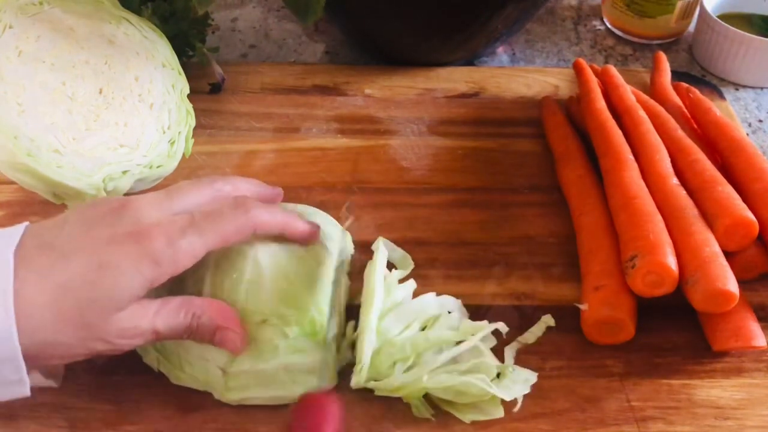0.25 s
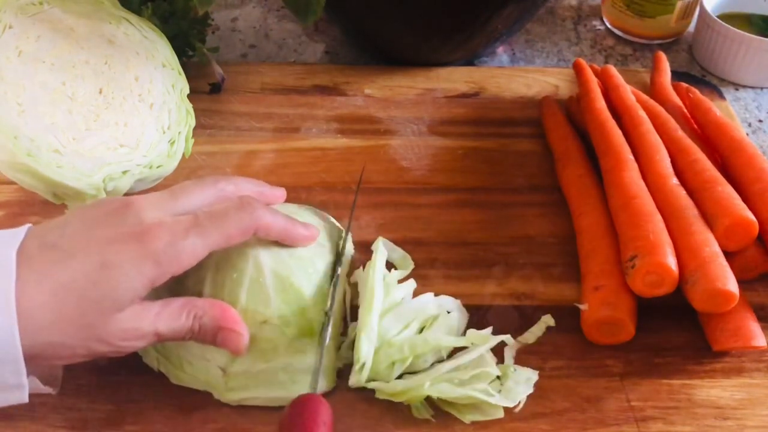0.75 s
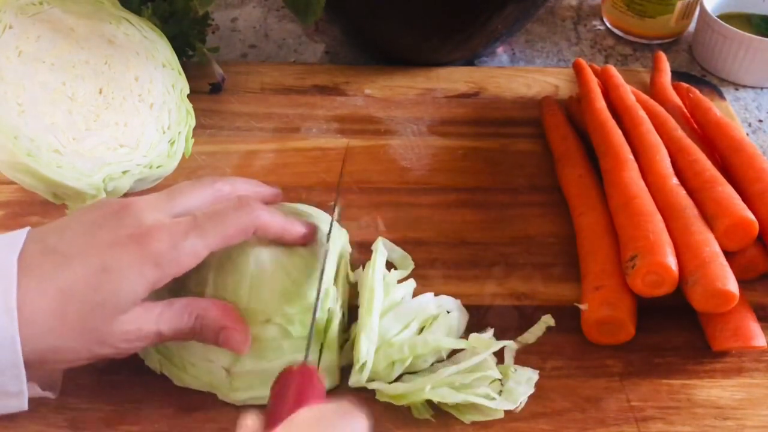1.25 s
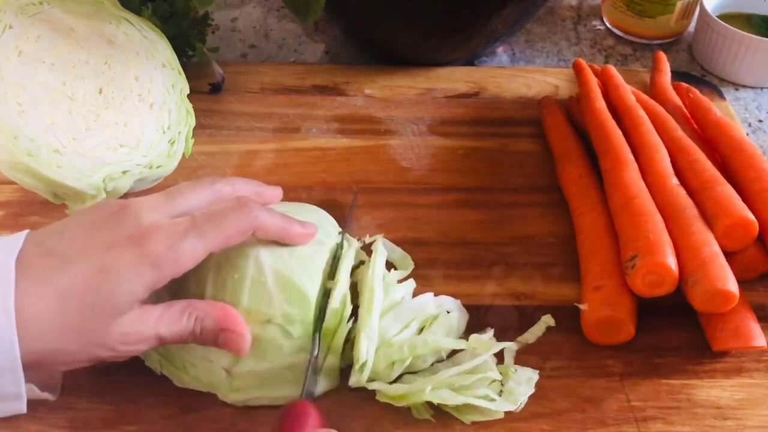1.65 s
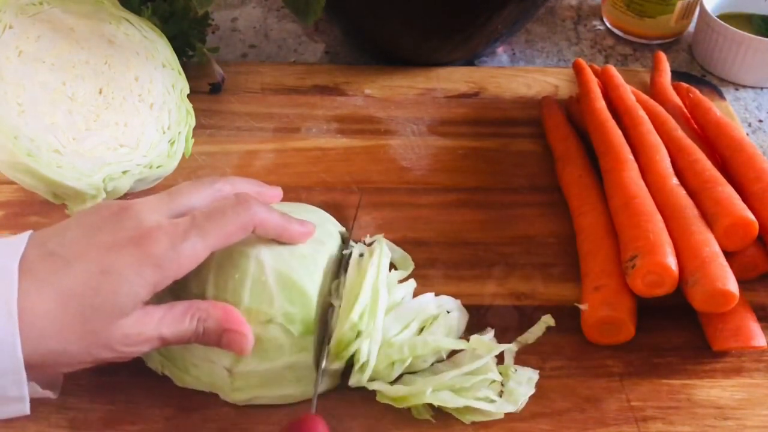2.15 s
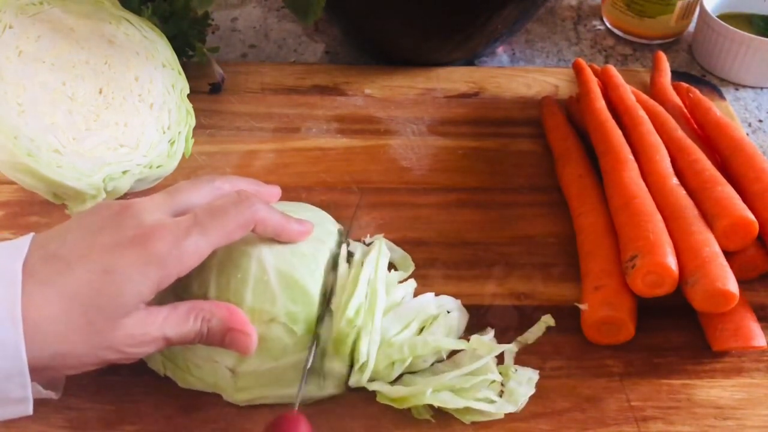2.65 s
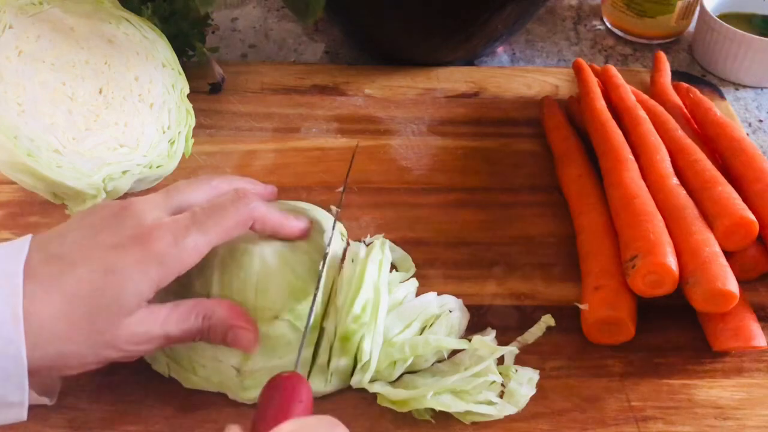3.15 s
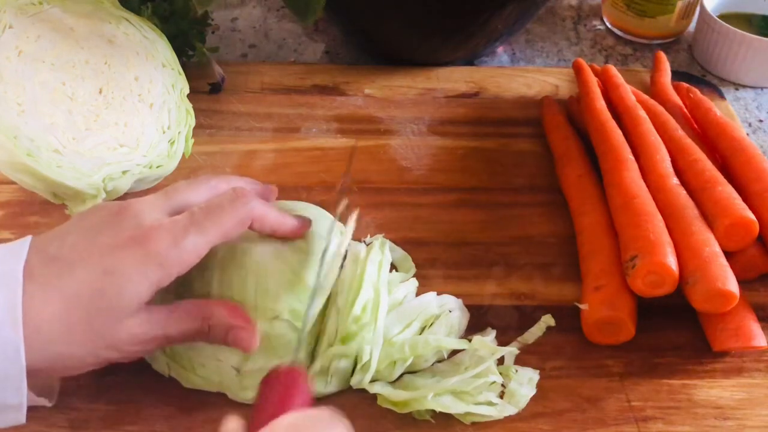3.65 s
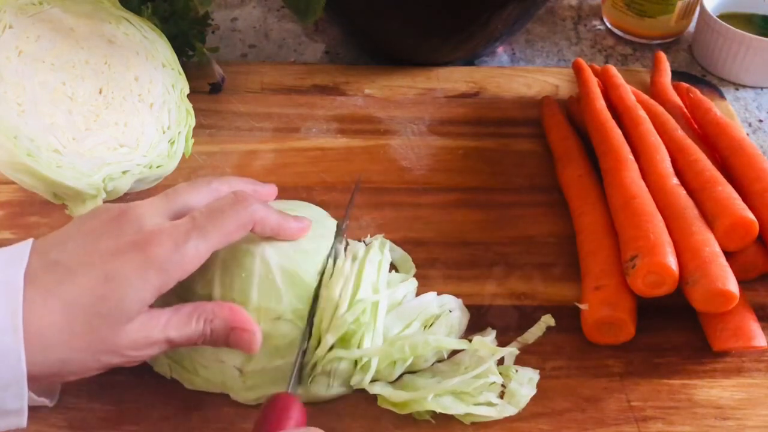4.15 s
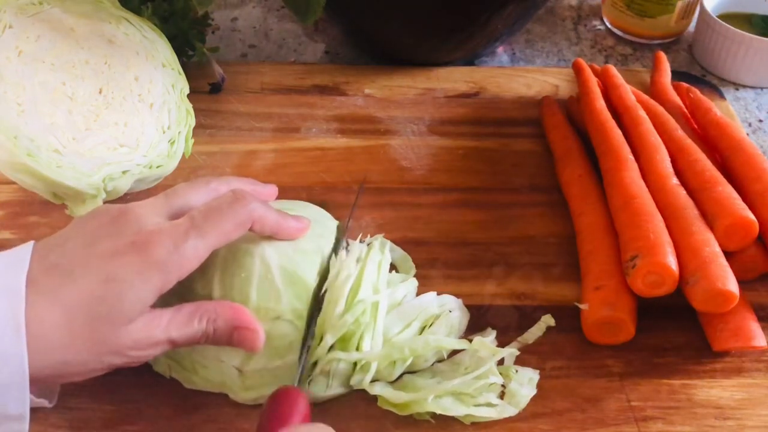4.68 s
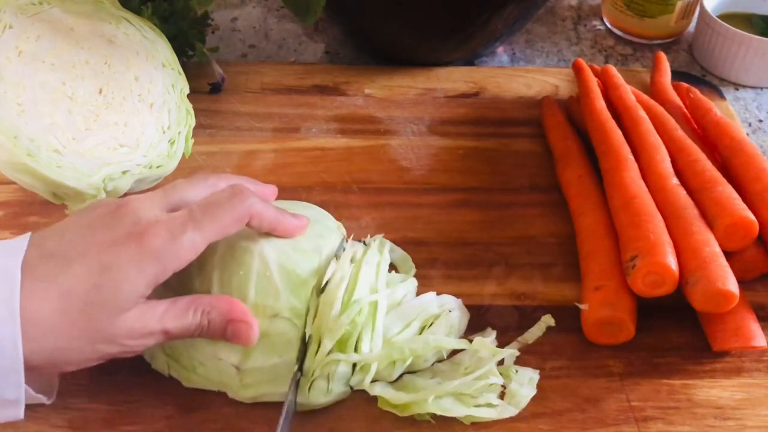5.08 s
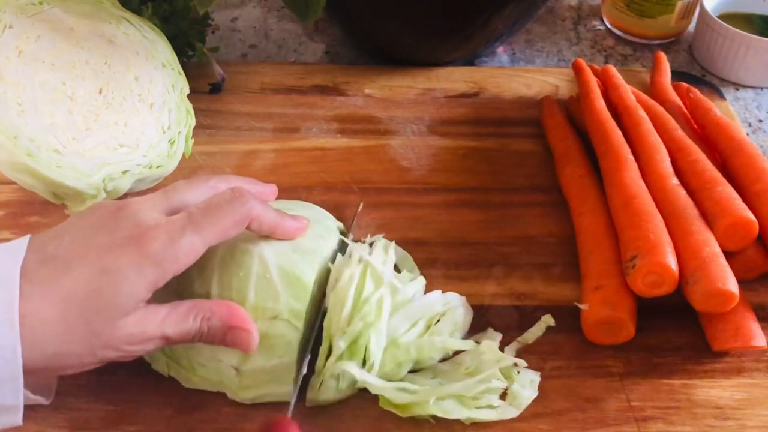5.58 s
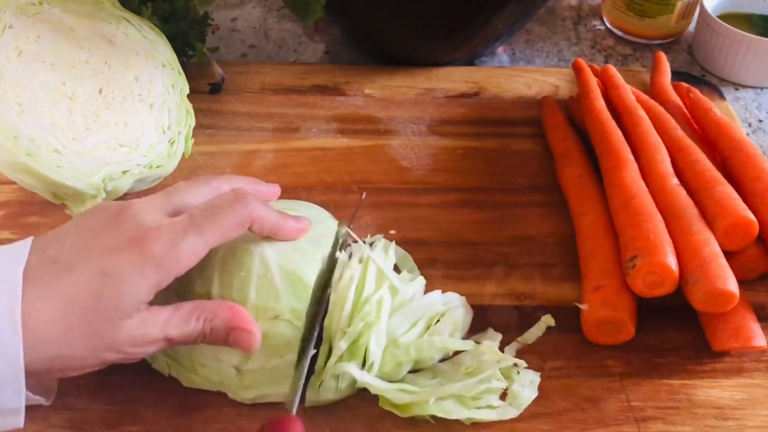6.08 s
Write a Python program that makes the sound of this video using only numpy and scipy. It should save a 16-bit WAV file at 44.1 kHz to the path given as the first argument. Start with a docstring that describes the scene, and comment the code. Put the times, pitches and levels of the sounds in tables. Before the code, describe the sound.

Crisp cabbage leaves crackle and snap under a slicing knife, with irregular chops on a wooden board in a kitchen.

```python
"""Slicing a cabbage

A kitchen knife saws through a cabbage: leaves tear in a dense crackle, their ribs snap, and the
rubbed blade sings faintly. Each landing knocks the wooden board and the worktop under it, and once
the knife tip clinks. The kitchen walls echo over a steady low rumble and hiss.
The loudest chops overload the microphone's input."""
import sys
import numpy as np
from scipy import signal
from scipy.fft import rfft, irfft, next_fast_len
from scipy.io import wavfile
from scipy.ndimage import map_coordinates

SR = 44100
rng = np.random.default_rng(int(sys.argv[2]) if len(sys.argv) > 2 else 0)


def int16_out(signal):
    """Quantize to a 16-bit WAV file."""
    q = np.round(np.clip(np.atleast_2d(signal).T, -1, 1) * 32767)
    wavfile.write(sys.argv[1], SR, q.astype(np.int16))


N = 278800

# tone of crushed leaves heard through the board: f/Hz, level/dB
CRUNCH_SPECTRUM = [(120, -33.5), (200, -7.5), (365, -24.5), (688, -9.5), (762, -11.5), (955, -11.5),
                   (1070, -12.5), (1720, -18.5), (3000, -30), (3900, -56.5), (6600, -120)]


def amp(db):
    """Turn decibels into a factor to multiply by."""
    return 10 ** (np.asarray(db) / 20)


def unit_rms(x):
    """Scale x so that its average strength (rms) is 1."""
    return x / np.sqrt(np.mean(x ** 2) + 1e-20)


def unit_peak(x):
    """Scale x so that its largest swing is 1."""
    return x / np.abs(x).max()


def curve_at(points, hz):
    """Read between (frequency, value) points, on a logarithmic frequency axis."""
    freqs, values = np.transpose(points)
    return np.interp(np.log(hz + 1), np.log(freqs + 1), values)


def filtered(x, response):
    """Multiply each frequency in x by response(frequency)."""
    size = next_fast_len(len(x) + 8192)
    return irfft(rfft(x, size) * response(np.fft.rfftfreq(size, 1 / SR)), size)[:len(x)]


def coloured(x, spectrum):
    """Shape the tone of x with a table of f/Hz, level/dB; the result has rms 1."""
    return unit_rms(filtered(x, lambda hz: amp(curve_at(spectrum, hz))))


def resonance(f, centre, width):
    """A filter response that favours the frequencies near its centre."""
    return 1j * f * width / (centre ** 2 - f ** 2 + 1j * f * width)


def wobble(rate):
    """A smooth curve through `rate` random values a second."""
    return map_coordinates(rng.standard_normal(int(N * rate / SR) + 4), [np.arange(N) * rate / SR])


def crackle(spread_db, clump_db, rate):
    """Tiny fibres break in clumps, a few louder than the rest."""
    size = np.minimum(rng.exponential(size=N), 5)
    return rng.standard_normal(N) * amp(spread_db * size + clump_db * wobble(rate))


def ringing(modes, t):
    """One fading sine per mode (a natural note of an object); its decay is the time to drop 60 dB."""
    hz, db, decay_s = np.transpose(modes)[:3, :, None]
    signs = (-1) ** np.arange(len(hz))[:, None]  # neighbours start in opposite directions
    return signs * amp(db - 60 * t / decay_s) * np.sin(2 * np.pi * hz * t)


def add(track, start_s, sound):
    """Mix a sound into the track at the given time."""
    part = track[round(start_s * SR):][:len(sound)]
    part += sound[:len(part)]


def room_tone():
    """The kitchen's steady low rumble and hiss."""
    # tone of the room: f/Hz, level/dB
    air_spectrum = [(12, -63), (20, 1.5), (69, -0.5), (131, -8.5), (450, -10.5), (518, -14.5), (907, -20),
                    (2630, -29), (4490, -27.5), (6460, -33.5), (11600, -30.5), (15000, -31), (16300, -39)]
    return amp(-55.5 + 0.27 * wobble(13.0)) * coloured(rng.standard_normal(N), air_spectrum)


def stroke_gains():
    """Each push or pull of the knife swells and fades; gives a loudness curve for each slicing layer."""
    # knife strokes: strongest at t/s, rise/s, fall/s, scrape/dB, crunch/dB, blade/dB, tearing/dB
    strokes = [(.005, .03, .06, -75, -75, -74, -70.5), (.115, .07, .06, -64, -77, -69.5, -65.5),
               (.325, .06, 0.077, -51, -53.5, -64, -58), (.465, .03, .06, -55, -62, -72, -64.5),
               (.55, .03, .03, -59, -82, -67.5, -71), (.62, .025, 0.13, -57, -68.5, -66.5, -62.5),
               (.69, .045, 0.093, -67, -54.5, -66, -67), (0.773, .07, .15, -44.5, -42, -63, -51),
               (0.892, .07, .04, -46.5, -43.5, -64, -50.5), (1.121, .09, 0.044, -51.5, -61.5, -62.5, -65),
               (1.2, .015, 0.094, -60.5, -73, -66, -67), (1.261, .05, .06, -53.5, -64, -65.5, -65),
               (1.335, .02, .05, -53, -58, -68, -63.5), (1.394, .07, 0.054, -52.5, -48.5, -60.5, -59),
               (1.519, .045, 0.091, -39.5, -37.5, -50.5, -49.5),
               (1.765, .05, .1, -56.5, -57.5, -68.5, -65.5), (1.937, .11, .03, -44.5, -52, -59, -56.5),
               (2.0, .07, .035, -40.5, -68, -57, -54.5), (2.095, .09, 0.029, -38.5, -48, -60, -52),
               (2.157, .012, .02, -51.5, -66, -60.5, -72), (2.247, .012, 0.042, -43.5, -72, -71, -57.5),
               (2.395, .07, 0.11, -45.5, -58.5, -59.5, -56), (2.495, .08, 0.062, -48, -50.5, -61, -54.5),
               (2.564, .05, 0.092, -44.5, -45.5, -57, -51), (2.921, .03, .04, -59.5, -58.5, -69.5, -70),
               (3.029, .05, 0.082, -56.5, -65.5, -66.5, -66.5), (3.09, .02, 0.055, -59, -58, -70, -68),
               (3.271, .13, 0.1, -48, -44.5, -55.5, -54.5), (3.32, .03, .02, -44.5, -38, -55.5, -47.5),
               (3.69, .025, 0.058, -63.5, -60, -65, -65.5), (3.8, .15, 0.093, -60, -53, -66.5, -66),
               (3.9, .05, 0.1, -54, -44.5, -58, -53.5), (4.039, .03, 0.087, -49, -38, -56, -51),
               (4.284, .03, .12, -63.5, -59.5, -68.5, -67), (4.51, .025, .08, -57.5, -57, -68, -63),
               (4.595, .06, 0.078, -55.5, -50, -61.5, -57.5), (4.82, .08, 0.16, -73, -68, -63, -66.5),
               (4.98, .13, 0.096, -64, -59.5, -57, -62), (5.056, .01, .02, -49.5, -50, -60, -50.5),
               (5.27, .05, .12, -64, -59.5, -63, -67), (5.375, .03, .03, -64, -68.5, -61, -68),
               (5.557, .09, 0.048, -62, -55, -63, -61.5), (5.71, .12, .03, -73, -58, -66, -65.5),
               (5.799, .04, 0.046, -75, -63.5, -74, -63.5), (5.97, .12, 0.08, -57, -55, -66.5, -60.5),
               (6.115, .05, 0.06, -44.5, -42, -53, -50)]
    power, t = np.zeros((4, N)), np.arange(N) / SR
    for top_s, rise_s, fall_s, *levels_db in strokes:
        away = np.where(t < top_s, (top_s - t) / rise_s, (t - top_s) / fall_s)  # in rises or falls
        moving = away < 0.82  # the blade moves only within this span
        swell = amp(-20.5 * away[moving] ** 1.3)
        start_stop = np.minimum((0.82 - away[moving]) / 0.07, 1)
        power[:, moving] += (amp(levels_db)[:, None] * swell * start_stop) ** 2
    return np.sqrt(power)


def slicing():
    """Fibres tear under the moving edge; one jerky motion shakes all four layers."""
    # waxy leaves sliding on the flat of the blade: f/Hz, level/dB
    scrape_spectrum = [(7000, -46), (9000, -17.5), (10300, -4), (11400, -2), (12600, -5), (13800, -14.5),
                       (16000, -30.5)]
    # tearing leaves: f/Hz, level/dB
    tear_spectrum = [(1470, -36.5), (2500, -25), (2900, -12), (3640, -12.5), (7270, -12), (11400, -8),
                     (15200, -16.5), (16300, -25)]
    # notes of the steel rubbed by leaves: f/Hz, width/Hz, level/dB
    blade_notes = [(3460, 200, -1.5), (4427, 130, 0.5)]

    def steel(f):
        """The blade rings at its own notes, which swing in opposite directions."""
        return sum((-1) ** k * amp(db) * resonance(f, hz, width)
                   for k, (hz, width, db) in enumerate(blade_notes))

    scrape, crunch, blade, tearing = stroke_gains()
    jerk = 0.32 * wobble(50) + 2.8 * wobble(150)
    # the blade's thin note under the scrape
    rasp = filtered(crackle(2.0, 2.5, rate=35), lambda f: resonance(f, centre=4480, width=300) ** 2)
    sliding = coloured(crackle(1.5, 0.93, rate=250), scrape_spectrum)
    scrape *= amp(0.37 * jerk) * (sliding + amp(-15) * unit_rms(rasp))
    tearing *= amp(5.5 + 1.2 * jerk) * coloured(crackle(4.4, 0.73, rate=610), tear_spectrum)
    crunch *= amp(0.8 * jerk) * coloured(crackle(2, 2.5, rate=140), CRUNCH_SPECTRUM)
    blade *= amp(1.6 * jerk) * unit_rms(filtered(crackle(3.5, 1.5, rate=80), steel))
    return scrape + tearing + crunch + blade


def kitchen_echo(x, build_s):
    """Echoes of x from the walls build up, then each frequency dies away at its own speed."""
    # what the walls send back: f/Hz, level/dB
    wall_spectrum = [(100, -3), (500, -4), (1500, -1.5), (4500, 0), (6500, -2.5), (9000, -1.5), (12000, -7),
                     (15000, -16)]
    # time for the echo to drop 60 dB: f/Hz, decay/s
    decays = [(200, 0.37), (530, 0.25), (1400, 0.29), (3700, 0.27), (9700, 0.36)]
    hz, t, noise = signal.stft(rng.standard_normal(SR // 2), SR, nperseg=256)
    fade_db = curve_at(wall_spectrum, hz)[:, None] - 60 * t / curve_at(decays, hz)[:, None]
    tail = signal.istft(noise * amp(fade_db), SR, nperseg=256)[1]
    tail *= 1 - np.exp(-np.arange(len(tail)) / SR / build_s)
    return signal.fftconvolve(x, tail / np.linalg.norm(tail))


def rib_snaps():
    """Each leaf rib breaks with a bright spit and a duller thump from the board."""
    # ribs breaking: t/s, level/dB, thump compared with spit/dB
    snaps = [(0.1084, -32, -8), (0.2798, -37.5, 0.5), (0.2977, -38.5, -27), (0.4579, -37.5, -9),
             (0.61, -38, -30), (0.722, -37.5, 0), (0.7755, -26, -7.5), (0.999, -39.5, -25),
             (1.054, -40.5, -25), (1.1933, -32.5, -25), (1.2593, -28, -5.5), (1.3248, -31.5, -23),
             (1.345, -35.5, -9.5), (1.36, -33, -8), (1.4, -30, -11.5), (1.4678, -24.5, -11.5),
             (1.491, -16, -5), (1.823, -38, -26), (1.8701, -31.5, -40), (2.0067, -26.5, -29),
             (2.0747, -27, -22), (2.1525, -32.5, -19.5), (2.226, -41.5, -30), (2.2381, -18.5, -29),
             (3.622, -39.5, -29.5), (3.6703, -26.5, -4), (3.7324, -34.5, -22), (3.7796, -29.5, 0),
             (3.8009, -31.5, -10), (3.8164, -34.5, -3), (3.8363, -27.5, -1), (3.8622, -23, -5),
             (3.881, -23.5, -1), (3.9125, -27, 0), (3.935, -31, 1.5), (3.9536, -28.5, -1),
             (4.0205, -21.5, -26), (4.232, -41, -16.5), (4.24, -34.5, -7.5), (4.2752, -32, -20),
             (4.4942, -33.5, -17), (4.9187, -38, 2), (5.17, -44.5, -30.5), (5.24, -41.5, -30.5),
             (5.478, -37, -29.5), (5.505, -40, -20), (5.735, -42, -30), (5.9534, -37, 1.5),
             (6.1015, -25.5, 0.5)]
    # tone of a breaking rib: f/Hz, level/dB
    spit_spectrum = [(2000, -28.5), (3500, -1), (7000, -10.5), (11000, 2.5), (14000, -6), (16000, -6)]
    spit_s, thump_decay_s = 0.0044, 0.05
    spit_gain, thump_gain, t = np.zeros(N), np.zeros(N), np.arange(SR // 8) / SR
    for start_s, db, thump_db in snaps:
        onset = amp(db) * (1 - np.exp(-t / 0.0004))
        add(spit_gain, start_s, onset * np.exp(-(t / spit_s) ** 2))
        add(thump_gain, start_s, onset * amp(thump_db - 60 * t / thump_decay_s))
    spit = unit_peak(coloured(crackle(1.4, 0.8, rate=400), spit_spectrum))
    thump = unit_peak(coloured(crackle(1.4, 0.8, rate=400), CRUNCH_SPECTRUM))
    return spit_gain * spit + thump_gain * thump


def edge_push(t, contact_ms):
    """The edge rolls onto the board, tip then heel; a longer contact makes a duller knock."""
    roll_ms, ms = 2.255, t * 1000
    tip = np.sin(np.pi * np.clip(ms / contact_ms, 0, 1))
    heel = np.sin(np.pi * np.clip((ms - roll_ms) / contact_ms, 0, 1))
    return (tip + 0.42 * heel) / tip.sum()


def edge_crack(x, crack_db, treble_db):
    """Give x the sharp tone of steel hitting wood."""
    # body of the crack: f/Hz, level/dB
    crack_spectrum = [(1500, -13.5), (2500, -3), (3100, -3), (4400, -5), (5200, -10), (7000, -37.5)]
    # treble of the crack: f/Hz, level/dB
    treble_spectrum = [(4000, -31), (6000, -1.5), (8000, -5), (11000, -3.5), (13500, -7), (16000, -15.5)]
    return amp(crack_db) * coloured(x, crack_spectrum) + amp(treble_db) * coloured(x, treble_spectrum)


def chops():
    """The knife lands and rings board and worktop; where it lands sets each board note's strength."""
    # landings: t/s, level/dB, contact/ms, place along the board (0 to 1),
    # then, on top of that level: thud/dB, high notes/dB, crack/dB, crack treble/dB
    landings = [(0.35, -17, 0.39, 0.33, -36, 0, -24, -35.5),
                (0.384, -18.5, 0.31, 0.05, -11.5, -4.5, -34, -41),
                (0.388, -22.5, 0.13, 0.39, -26, -29, -41, -34), (0.906, -6, 0.34, 0.2, -7, -2, -21.5, -24),
                (1.128, -35, 0.34, 0.34, -5.5, -16, -28, -11), (1.559, 3, 0.42, 0.38, -41, 0.5, -9.5, -20),
                (1.78, -39, 0.25, 0.1, -11, -10, -19, -14), (1.947, -25, 0.45, 0.32, -17, 0, -18, -10.5),
                (2.09, -23.5, 0.2, 0.19, -13.5, -31, -28.5, -14),
                (2.668, -0.5, 0.23, 0.32, -21.5, -2.5, -10, -28.5),
                (2.896, -34, 0.32, 0.26, -20, 1, -20, -21.5),
                (3.083, -40.5, 0.33, 0.4, -2.5, -14, -11.5, -7.5),
                (3.332, 2.5, 0.29, 0.33, -16.5, 0, -9, -21.5),
                (3.539, -39, 0.1, 0.27, -25.5, -4, -15, -18.5), (4.024, -36, 0.33, 0.24, -18, -12, -16, -3),
                (4.061, -13, 0.29, 0.25, -12.5, -5, -23.5, -28),
                (4.599, -41.5, 0.6, 0.5, 2.5, -3, -4.5, -5),
                (5.062, -6.5, 0.23, 0.38, -22, -1.5, -12, -29.5),
                (5.578, -14.5, 0.28, 0.06, -20, 0.5, -36, -34),
                (5.593, -11, 0.36, 0.31, -13, -5, -21.5, -34.5),
                (5.645, -23.5, 0.36, 0.03, -11, -29, -22, -37),
                (6.127, 0.5, 0.27, 0.06, -6, 1, -18.5, -24.5)]
    # notes of the board: f/Hz, level/dB, decay/s, half waves along the board
    board_modes = [(585.3, 2, 0.037, 0.99), (674.3, 7, 0.038, 0.8), (791, -13, 0.088, 2.2),
                   (940, -1, 0.022, 2.3), (1077, -7.5, 0.059, 9), (1182, 2, 0.0083, 8),
                   (1377, -1.5, 0.013, 1.7), (1550, 0, 0.015, 2.15), (1809, -7.5, 0.025, 0.58),
                   (1980, -8, 0.023, 3.1), (2720, -15, 0.0096, 0.56), (3150, -13.5, 0.018, 1.1),
                   (3200, -24, 0.018, 2.3), (4780, -17.5, 0.013, 0.34)]
    # notes of the worktop under it: f/Hz, level/dB, decay/s
    worktop_modes = [(191, -5.5, 0.027), (319, -7, 0.081), (409, 0, 0.016), (498, -4, 0.04),
                     (455, -13, 0.05)]
    out, t = np.zeros(N), np.arange(SR // 8) / SR
    hz, _, _, half_waves = np.transpose(board_modes)
    board, is_high = ringing(board_modes, t), hz > 1150
    thud = unit_peak(ringing(worktop_modes, t).sum(0))
    spike = signal.unit_impulse(len(t), 60)
    crack_fade = amp(-60 * t / 0.017) * (1 - np.exp(-t / 0.0003))
    for start_s, db, contact_ms, place, thud_db, high_db, crack_db, treble_db in landings:
        share = 0.1 + np.abs(np.sin(np.pi * half_waves * place))
        low_notes = unit_peak((share * ~is_high) @ board)
        high_notes = unit_peak((share * is_high) @ board)
        ring = low_notes + amp(high_db) * high_notes + amp(thud_db) * thud
        knock = np.convolve(ring, edge_push(t[:400], contact_ms))[:len(t)]
        # a small board gives off no deep bass
        knock = filtered(knock, lambda f: (1j * f / (200 + 1j * f)) ** 2)
        crack = crack_fade * edge_crack(rng.standard_normal(len(t)), crack_db, treble_db)
        add(out, start_s, amp(db) * (knock + crack))
        # for the walls, the crack is one click of the same energy
        click = edge_crack(spike, crack_db, treble_db) * np.sqrt(np.mean(crack_fade ** 2))
        add(out, start_s, amp(db - 9) * kitchen_echo(knock + click, build_s=0.0016))
    return out


def tip_clink():
    """The steel tip of the knife rings briefly and the walls answer."""
    # the clink: t/s, level/dB
    clinks = [(2.2519, -21)]
    # notes of the tip: f/Hz, level/dB, decay/s
    tip_modes = [(470, -14, .025), (1240, 1, 0.011), (1470, -1, .016), (2770, -19, .02),
                 (4440, -24.5, 0.022)]
    out, t = np.zeros(N), np.arange(SR // 8) / SR
    ring = unit_peak(ringing(tip_modes, t).sum(0))
    for start_s, db in clinks:
        add(out, start_s, amp(db) * ring)
        add(out, start_s, amp(db - 11) * kitchen_echo(ring, build_s=0.0015))
    return out


def scene():
    """Everything that reaches the one microphone."""
    leaves = rib_snaps() + slicing()
    knife_hits = chops() + tip_clink()
    leaf_echo = amp(-14.5) * kitchen_echo(leaves, build_s=0.002)[:N]
    return (leaves + knife_hits + leaf_echo + room_tone())[None]


def record(dry):
    """The input flattens the loudest peaks and cuts off the very highest treble."""
    ceiling, hardness, top_hz = 0.97, 12, 15900
    clipped = dry[0] / (1 + np.abs(dry[0] / ceiling) ** hardness) ** (1 / hardness)
    return filtered(clipped, lambda hz: hz < top_hz)[None]


dry = scene()
out = record(dry)
int16_out(out)
```